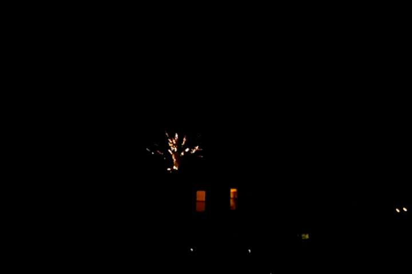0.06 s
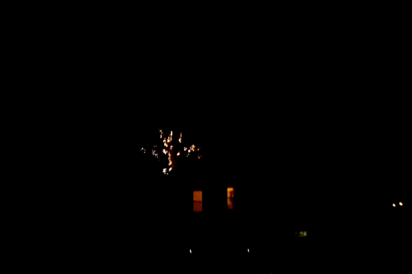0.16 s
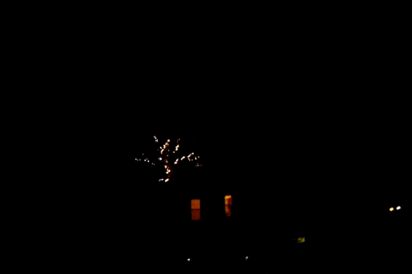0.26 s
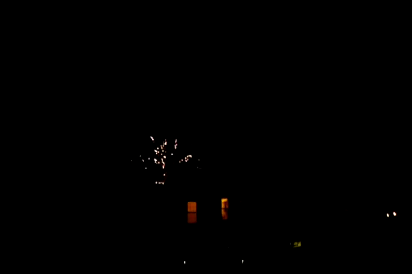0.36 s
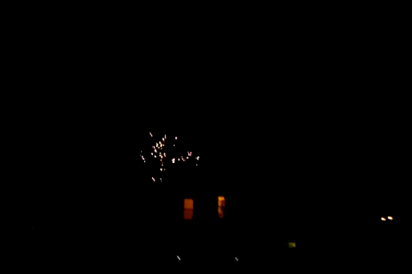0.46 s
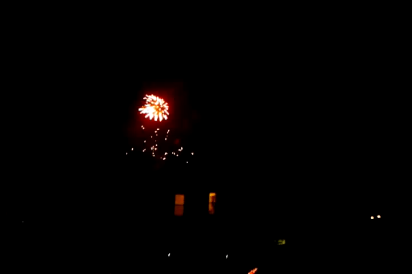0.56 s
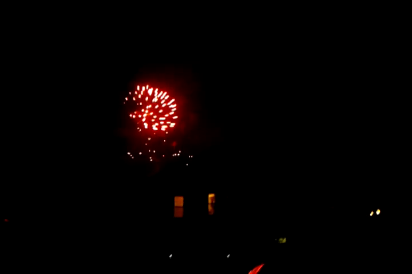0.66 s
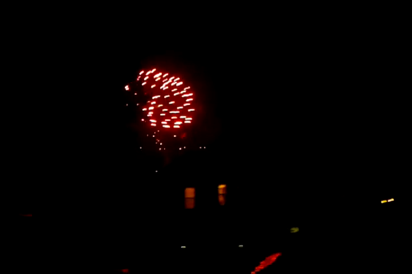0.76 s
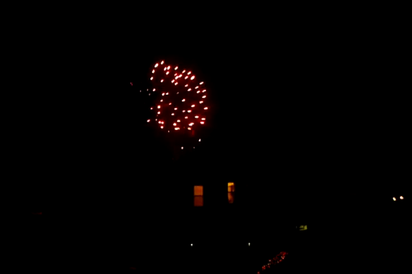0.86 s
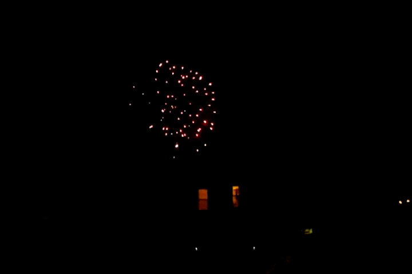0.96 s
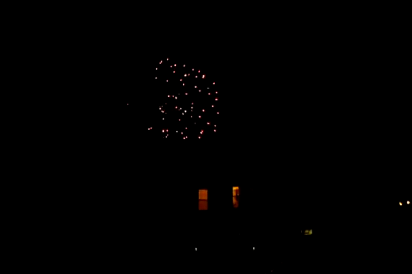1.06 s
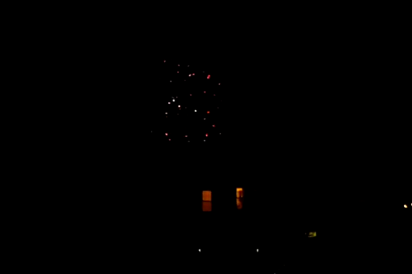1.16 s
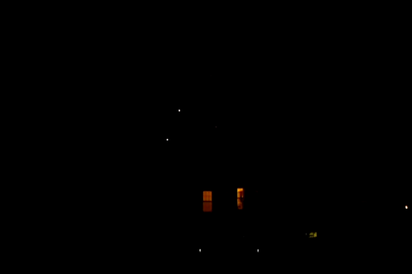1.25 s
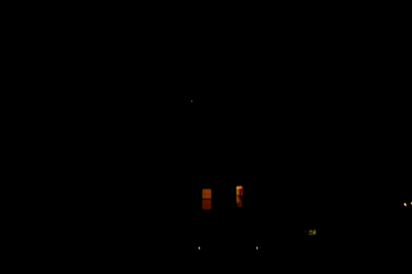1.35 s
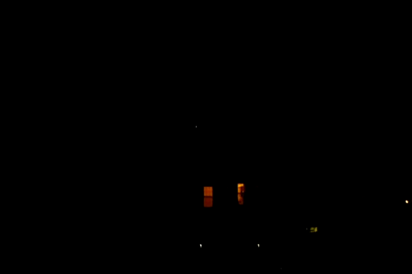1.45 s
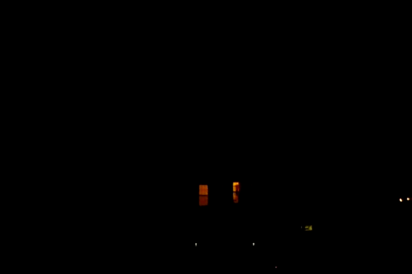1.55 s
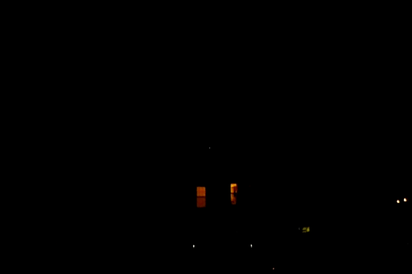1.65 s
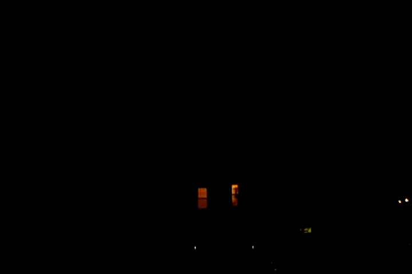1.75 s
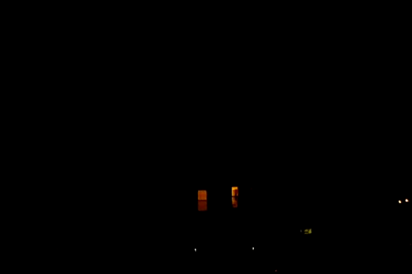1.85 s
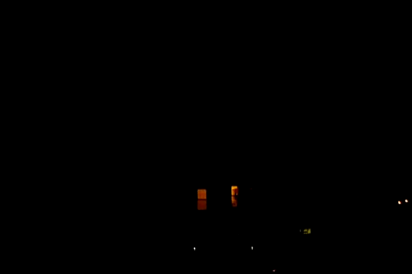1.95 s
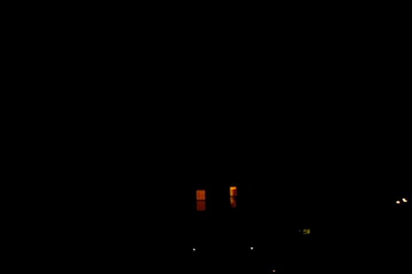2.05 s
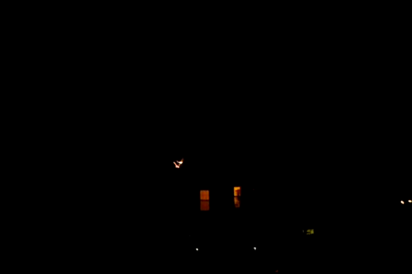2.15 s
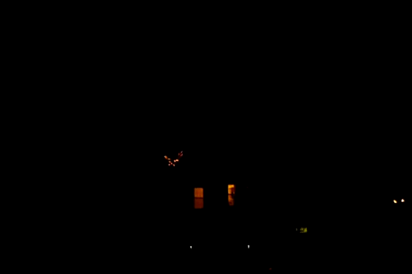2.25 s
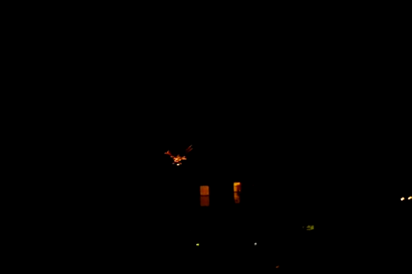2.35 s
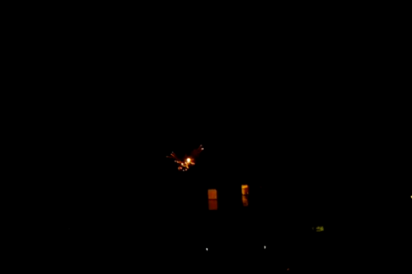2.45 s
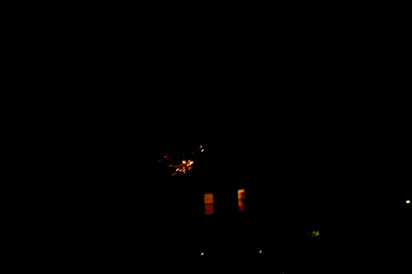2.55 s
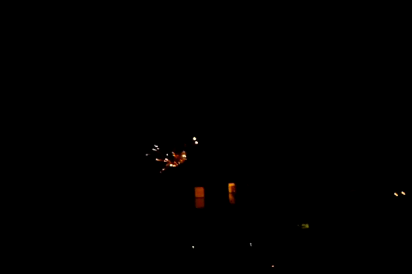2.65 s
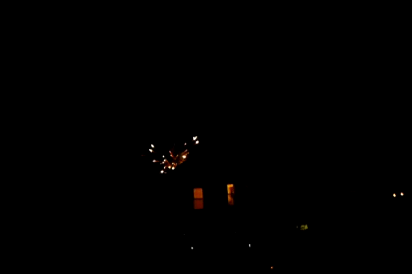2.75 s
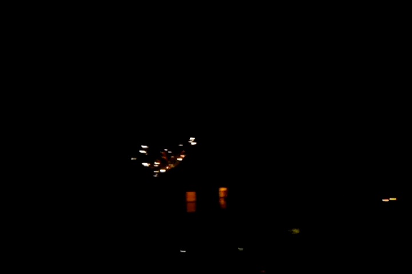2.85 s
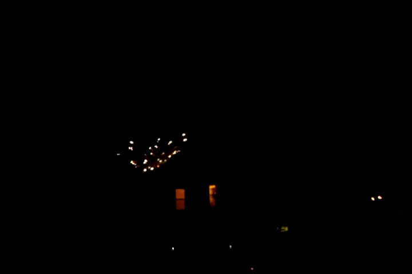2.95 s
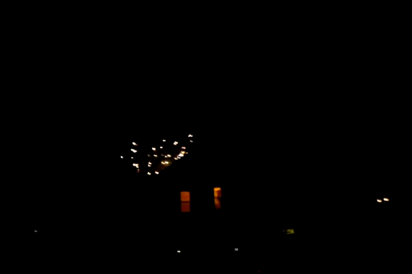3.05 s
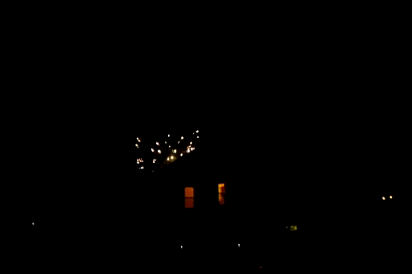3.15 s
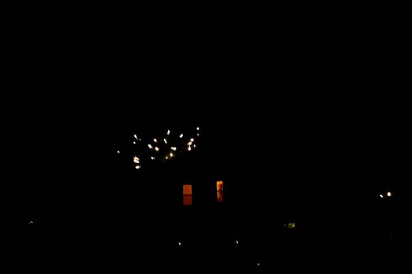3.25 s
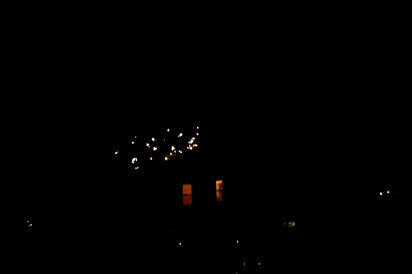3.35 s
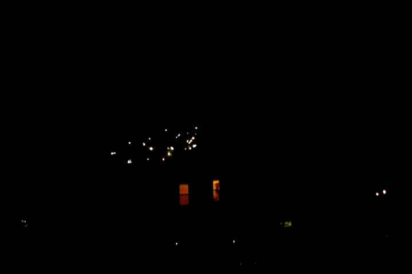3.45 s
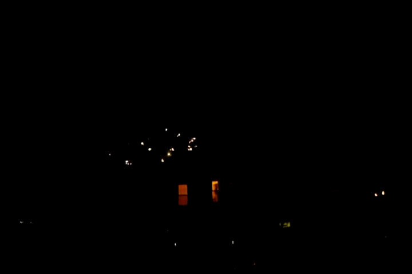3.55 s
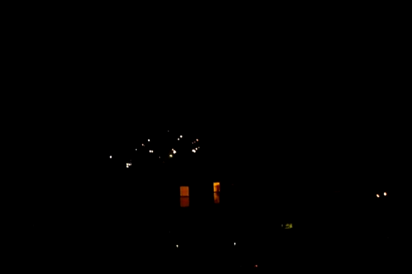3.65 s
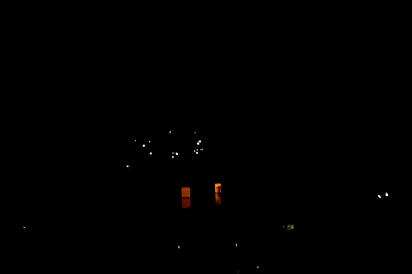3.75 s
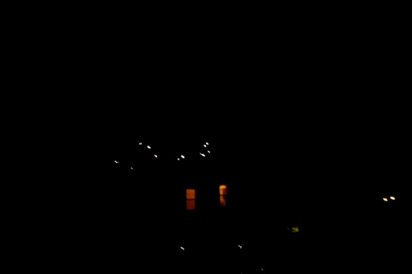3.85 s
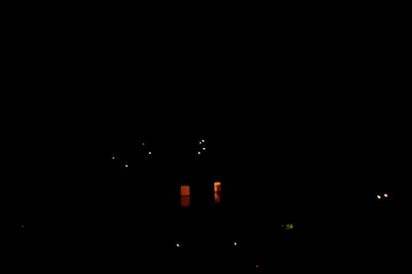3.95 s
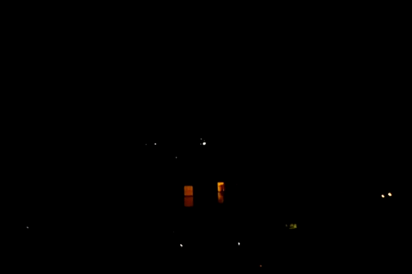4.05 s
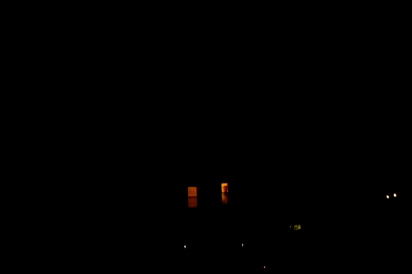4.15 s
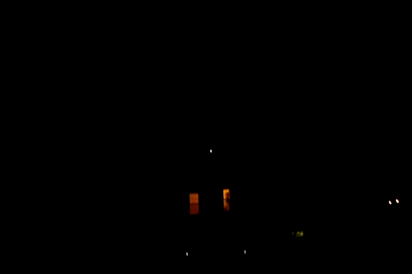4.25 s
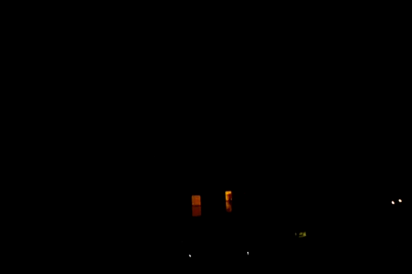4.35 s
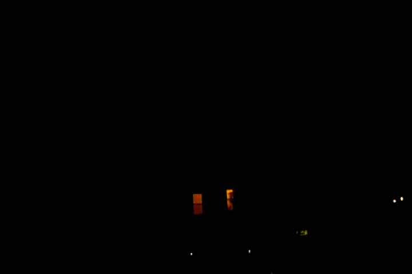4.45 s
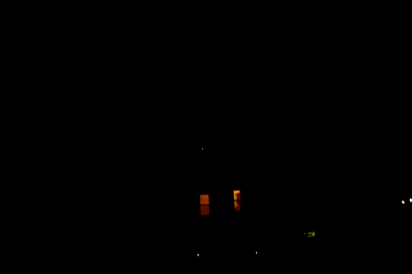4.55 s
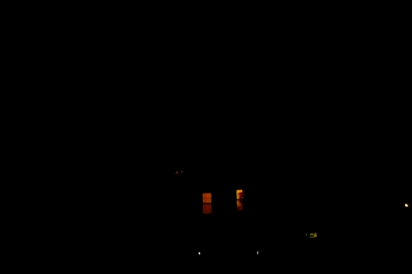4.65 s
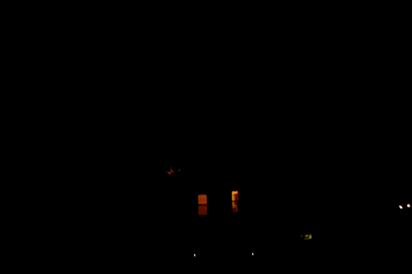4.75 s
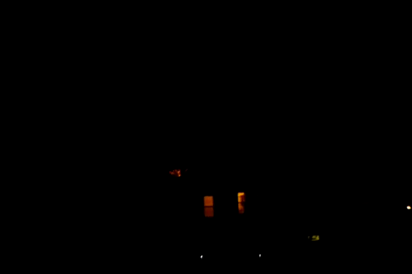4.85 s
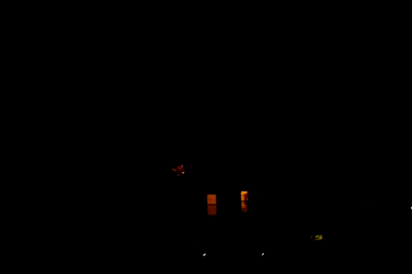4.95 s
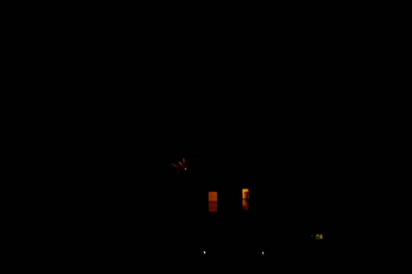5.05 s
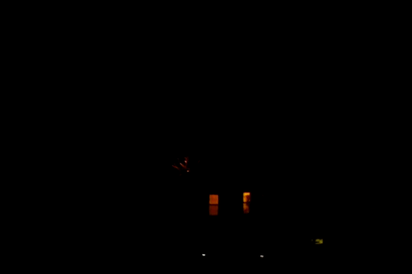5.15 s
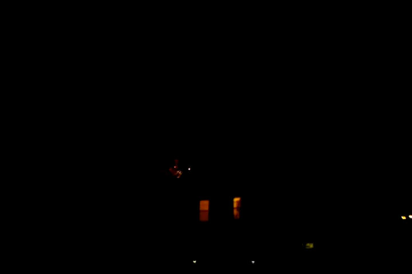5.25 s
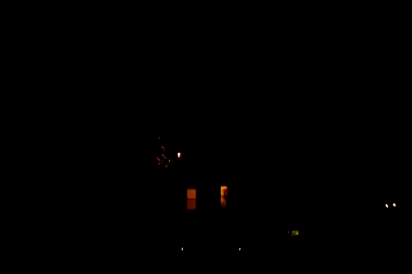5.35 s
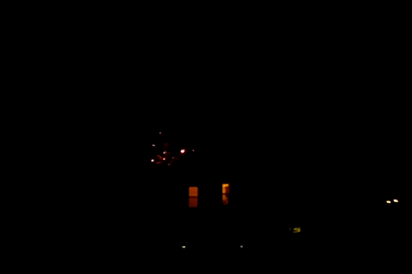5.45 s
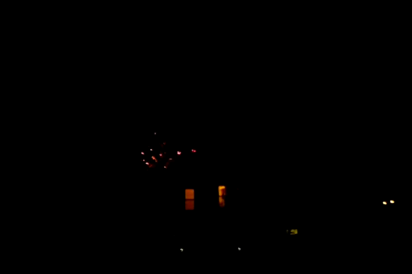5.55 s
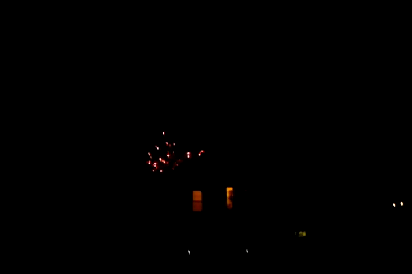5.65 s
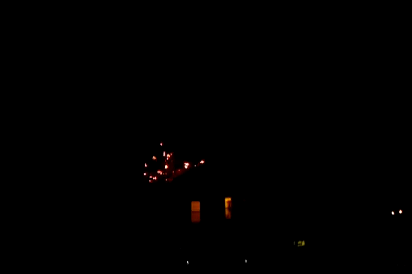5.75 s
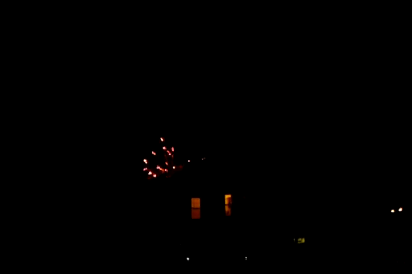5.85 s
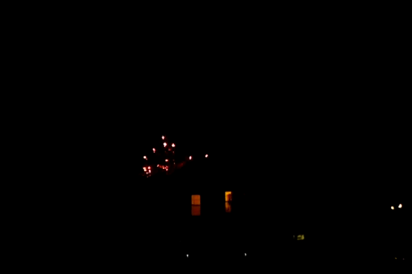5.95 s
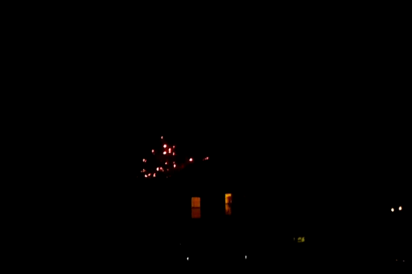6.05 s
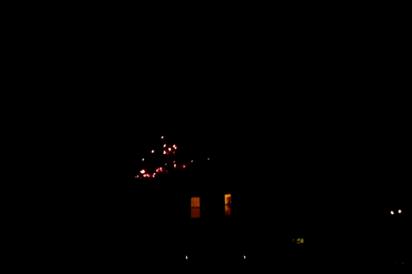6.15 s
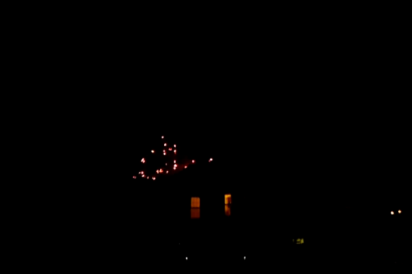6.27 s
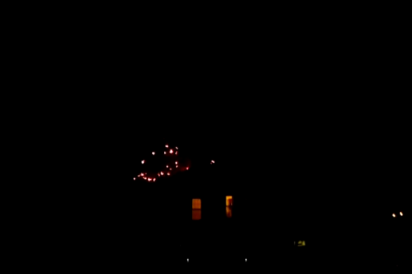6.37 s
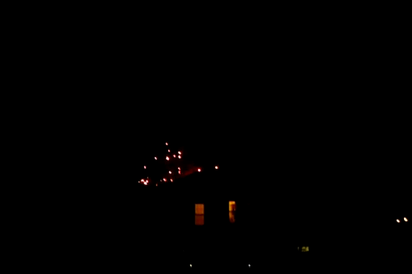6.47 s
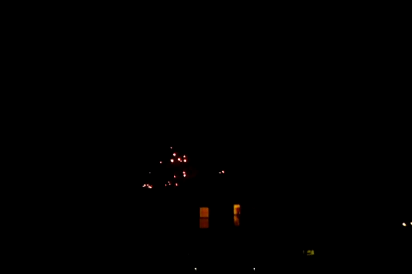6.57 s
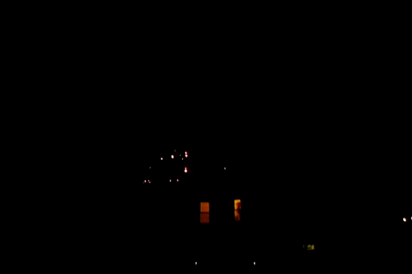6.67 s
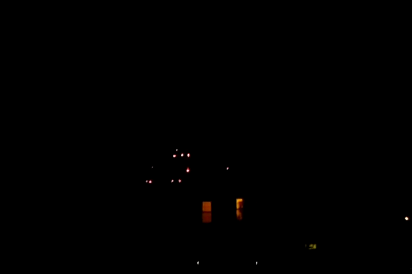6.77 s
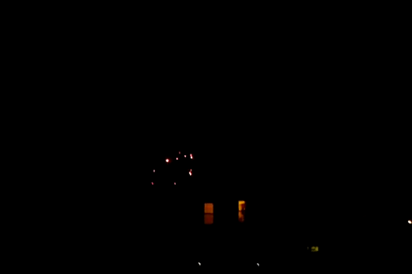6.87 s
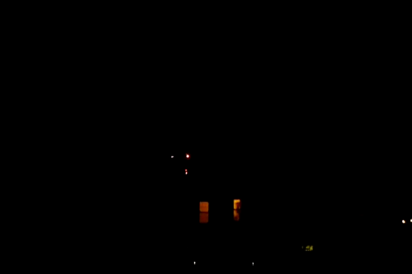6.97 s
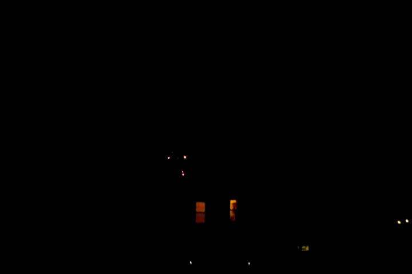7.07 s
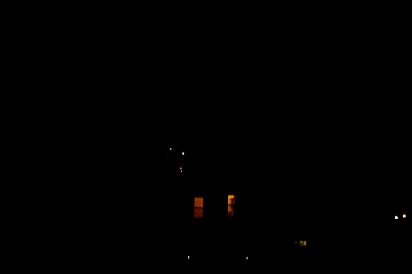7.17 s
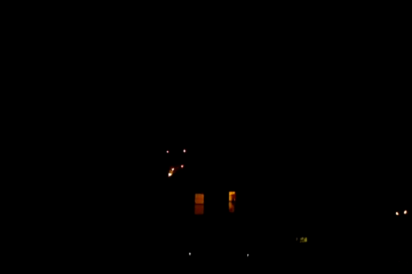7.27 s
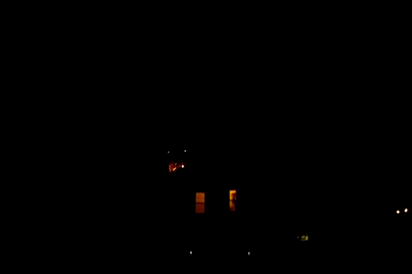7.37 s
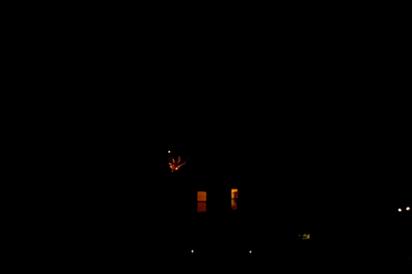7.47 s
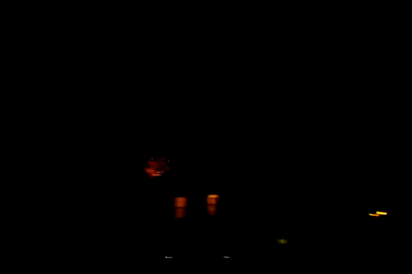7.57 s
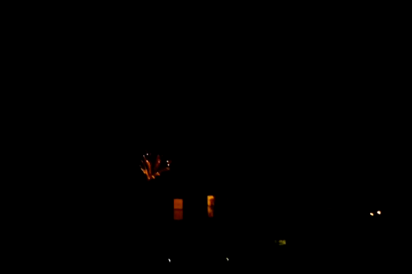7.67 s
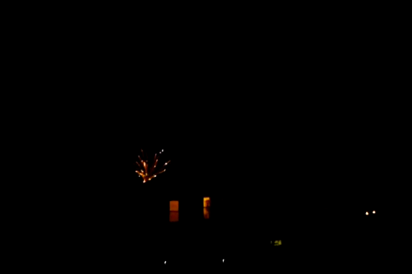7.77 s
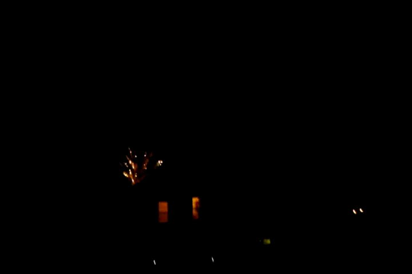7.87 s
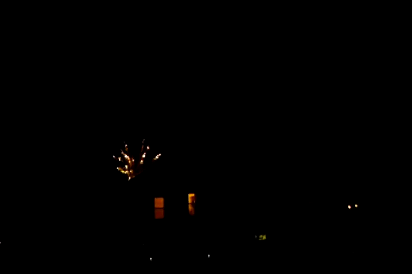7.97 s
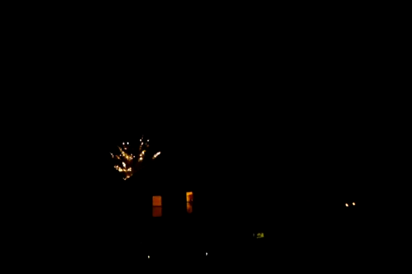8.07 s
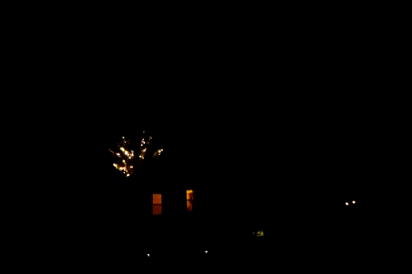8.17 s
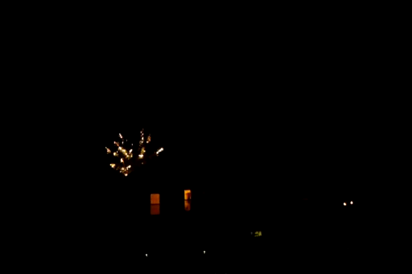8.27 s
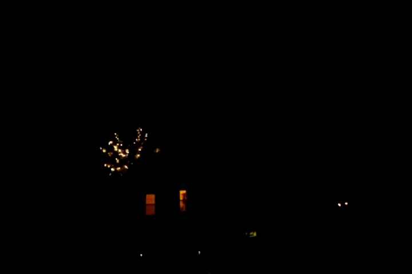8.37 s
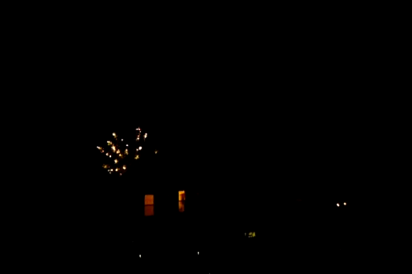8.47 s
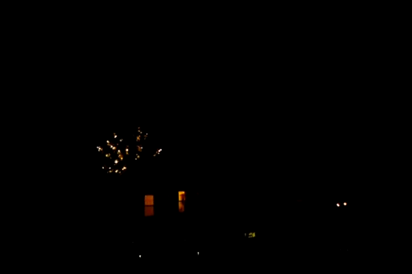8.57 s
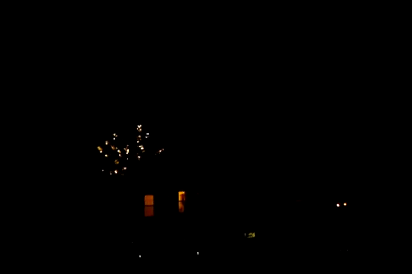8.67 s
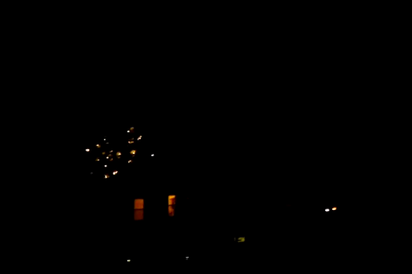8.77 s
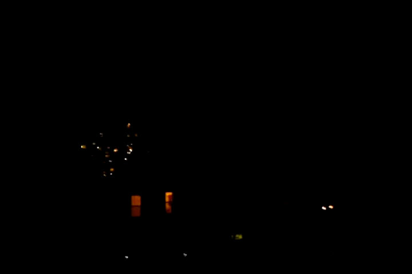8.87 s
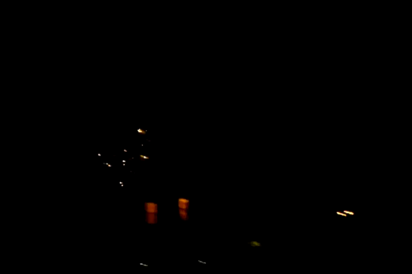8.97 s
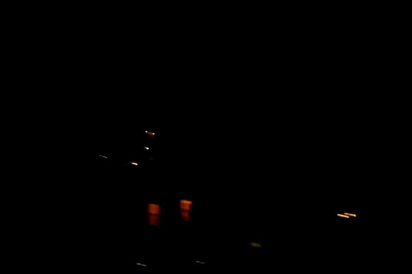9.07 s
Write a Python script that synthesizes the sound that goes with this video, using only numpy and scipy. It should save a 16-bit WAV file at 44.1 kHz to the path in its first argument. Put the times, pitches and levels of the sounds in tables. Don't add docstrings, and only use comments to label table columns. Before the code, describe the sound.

Distant fireworks burst in quick clusters a few seconds apart, overloading a small microphone, with sizzling and snapping stars and rumbling echoes.

```python
import sys
import numpy as np
from scipy import signal
from scipy.io import wavfile

SR = 44100
rng = np.random.default_rng(int(sys.argv[2]) if len(sys.argv) > 2 else 0)


def gain_from_decibels(decibels):
    exponent = np.asarray(decibels, float) / 20
    return 10 ** exponent


def master(y):
    cut = np.clip(np.atleast_2d(y).T, -1, 1)
    pcm = np.round(cut * 32767)
    wavfile.write(sys.argv[1], SR, pcm.astype(np.int16))


N = 402191


def at_hz(points, hz):
    points_hz, points_db = np.transpose(points)
    return np.interp(np.log(hz), np.log(points_hz), points_db)


def filtered(x, kind, hz, order=2):
    return signal.sosfilt(signal.butter(order, hz, kind, fs=SR, output="sos"), x)


def bands(sources):
    edges_hz = 20 * 2 ** np.arange(0, 9.1, 0.5)
    split = []
    for k, (low, high) in enumerate(zip(edges_hz, edges_hz[1:])):
        split.append((np.sqrt(low * high), filtered(sources[k % 2], "band", [low, high])))
    return split


def spikes(shape, spread_db):
    size_db = spread_db * np.minimum(rng.exponential(1, shape), 5)
    grains = gain_from_decibels(size_db) * rng.choice([-1, 1], shape)
    return grains / np.sqrt(np.mean(grains ** 2))


# f/Hz, density/dB per Hz
NIGHT_SPECTRUM = [(12, -35), (20, -18), (44, -9.5), (102, -13.5), (279, -10.5), (309, -2), (333, -25.5),
                  (397, -8), (428, -9), (932, -26), (3530, -34.5), (6290, -31.5), (8080, -20), (10500, -54),
                  (17800, -120)]
NIGHT_DB = -43 + 2.0
EARLIER_RUMBLE_DB, EARLIER_FALL_DB_S = -2, 3.5


def night():
    sources = rng.standard_normal((2, N))
    noise = sum(gain_from_decibels(at_hz(NIGHT_SPECTRUM, hz)) * band for hz, band in bands(sources))
    earlier = gain_from_decibels(EARLIER_RUMBLE_DB - EARLIER_FALL_DB_S * np.arange(N) / SR)
    return gain_from_decibels(NIGHT_DB) * (1 + earlier) * noise / np.std(noise)


def blasts(rows, thump_db, slower, crack_db, far=False):
    out = np.zeros(N)
    t = np.arange(int(0.06 * SR)) / SR
    for s, blast_db, hz, cycles, shore_db in rows:
        swing = np.cos(2 * np.pi * hz * t - 0.2) * np.exp(-t * hz / cycles)
        thump_hz = slower * hz
        thump = np.sin(2 * np.pi * thump_hz * t) * np.exp(-1.2 * thump_hz * t)
        front = np.cos(2 * np.pi * 2600 * t) * np.exp(-t / 0.000087)
        wave = swing + gain_from_decibels(thump_db) * thump + gain_from_decibels(crack_db) * front
        start = round(s * SR)
        out[start:start + len(t)] += gain_from_decibels(blast_db + far * shore_db) * wave[:N - start]
    return out


def mirrors(echoes):
    response = np.zeros(int(2.6 * SR))
    click = np.eye(1, 600)[0]
    for delay_s, level_db, sign, dull_hz in echoes:
        start = round(delay_s * SR)
        response[start:start + len(click)] += sign * gain_from_decibels(level_db) * filtered(click, "low", dull_hz)
    return response


# f/Hz, level/dB
SCATTER_COLOUR = [(40, 12.5), (85, 0), (160, -1.5), (260, 2), (400, -3), (700, -1.7), (1100, -2), (1800, 2),
                  (3200, -2), (7000, 3)]
# level/dB, tilt above 1 kHz/dB per octave, fall/dB per s, extra fall/dB per s per kHz
RIPPLES = (-37, 1.5, 793, -23.5)
BANKS = (-46, 0.5, 49.5, 1.5)
HILLS = (-52.5, -4.5, 15, 0)
ARRIVE_S, BANKS_LAST_S = 0.014, 0.15
LUMP_S, LUMP_DB, LUMP_BELOW_HZ = 0.009, 2.0, 900
RIDGE_S, RIDGE_WIDTH_S, RIDGE_DB = 1.136, 0.08, 0


def crowd(reflectors, hz, since_s):
    level_db, tilt_db, fall_db_s, faster_db_s = reflectors
    start_db = level_db + tilt_db * np.log2(max(hz / 1000, 1))
    return gain_from_decibels(start_db - (fall_db_s + faster_db_s * hz / 1000) * since_s)


def scatter(grain_db):
    t = np.arange(int(2.6 * SR)) / SR
    arrived = (1 - np.exp(-t / ARRIVE_S)) ** 2
    knots_s = np.arange(0, 2.7, LUMP_S)
    lumps = gain_from_decibels(np.interp(t, knots_s, LUMP_DB * rng.standard_normal(len(knots_s))))
    ridge = gain_from_decibels(RIDGE_DB * np.exp(-((t - RIDGE_S) / RIDGE_WIDTH_S) ** 2))
    out = np.zeros(len(t))
    for hz, band in bands(ridge * spikes((2, len(t)), grain_db)):
        ripples = crowd(RIPPLES, hz, t)
        banks = crowd(BANKS, hz, np.maximum(t - BANKS_LAST_S, 0))
        hills = crowd(HILLS, hz, t)
        level = np.sqrt(ripples ** 2 + arrived ** 2 * (banks ** 2 + hills ** 2))
        if hz < LUMP_BELOW_HZ:
            level = level * lumps
        out += gain_from_decibels(at_hz(SCATTER_COLOUR, hz)) * level * band
    return out


def outdoors(x, echoes, scatter_db, grain_db):
    response = gain_from_decibels(scatter_db) * scatter(grain_db) + mirrors(echoes)
    response[0] += 1
    return signal.fftconvolve(x, response)[:N]


# t/s, blast level/dB, swing f/Hz, ringing/cycles, level towards far shore/dB
BURSTS = [(.0939, 12, 449, 0.6, -10), (.1620, 13, 414, 0.32, -6), (.2869, 11.5, 455, 1, -6),
          (.2972, 14.5, 485, 0.57, -19), (.3066, 11.5, 375, 0.44, -40), (2.9034, 11.5, 431, 0.32, -8),
          (2.9240, 13.5, 398, 0.61, -29), (3.1210, 11, 487, 0.96, -6), (3.2427, 13.5, 381, 0.51, -6.5),
          (3.2903, 11, 446, 0.62, -11.5), (5.3549, 10.5, 397, 0.51, -0.5), (5.4438, 12, 392, 0.54, -2.5),
          (5.6116, 11, 435, 0.31, -4), (5.7688, 11.5, 408, 0.47, -4.5), (6.0016, 11, 455, 0.52, -4.5),
          (7.9406, 10.5, 474, 0.53, -23), (8.0100, 11, 486, 0.48, -4), (8.0431, 13, 436, 0.66, -7),
          (8.1004, 14, 475, 0.57, -7.5)]
# delay t/s, level/dB, sign, dulled above f/Hz
ECHOES = [(.0027, -8, 1, 7500), (.0120, -11, 1, 1000), (.0217, -22, -1, 1200), (.0337, -19, 1, 6000),
          (.0526, -24, -1, 1200), (.0652, -23, 1, 1200), (.0855, -16, -1, 1500), (.0925, -17, 1, 1500),
          (.1334, -22, 1, 1200), (.1457, -18, -1, 1200), (.1576, -15, 1, 1500), (.1829, -14, 1, 1500),
          (.2640, -25, 1, 1000), (.7340, -20, -1, 420), (.7345, -32, -1, 2200), (1.05, -38, 1, 500),
          (1.3750, -37, 1, 600)]
# delay t/s, level/dB, signed gain, dulled above f/Hz
FAR_SHORE = [
    (.3400, -10.5, 0.74, 1460),
    (.3428, -16, -1.6, 2030),
    (.4270, -47, 0.81, 1190),
    (.5010, -19.5, 0.57, 900),
    (.6570, -13.5, 0.86, 350),
]


def low_shells():
    near = blasts(BURSTS, thump_db=-27.5, slower=0.72, crack_db=-13.0)
    shore = blasts(BURSTS, thump_db=-42, slower=0.6, crack_db=-3.0, far=True)
    returned = signal.fftconvolve(shore, mirrors(FAR_SHORE))[:N]
    return outdoors(near, ECHOES, scatter_db=3.5, grain_db=7.5) + returned


CATCH_DB_S, SAG_DB_S, DIE_DB_S = 32, 12, 83


def burn(rows):
    t = np.arange(N) / SR
    level = np.zeros(N)
    for alight_s, spent_s, level_db in rows:
        catching_db = CATCH_DB_S * np.maximum(alight_s - t, 0)
        sagging_db = SAG_DB_S * np.maximum(t - alight_s, 0)
        dying_db = DIE_DB_S * np.maximum(t - spent_s, 0)
        level += gain_from_decibels(level_db - catching_db - sagging_db - dying_db) * (t > alight_s - 0.6)
    return level


def snap(clicks, hz, cycles):
    t = np.arange(int(0.002 * SR)) / SR
    return signal.fftconvolve(clicks, np.cos(2 * np.pi * hz * t) * np.exp(-t * hz / cycles))[:N]


def small_snaps(sharp, full):
    return snap(filtered(sharp, "high", 3100), hz=6300, cycles=0.2) + snap(full, hz=1900, cycles=0.27)


def fizz(rows, per_s, body_db, clump):
    struck = rng.random(N) < per_s * clump / SR
    sharp = struck * spikes(N, spread_db=3.5) * burn(rows) * gain_from_decibels(-1.5) * np.sqrt(SR / per_s)
    return small_snaps(sharp, sharp * gain_from_decibels(body_db) * rng.choice([-1, 1], N))


# fully alight t/s, burnt out t/s, level/dB
GLITTER = [
    (.85, 1.5, -16.5),
    (8.95, 9.5, -17.5),
]
GLITTER_PER_S, GLITTER_BODY_DB = 2900, -14.5
FLASH_PER_S, FLASH_DB, FLASH_BODY_DB = 50, -8, -13


def glitter(clump):
    struck = rng.random(N) < FLASH_PER_S / SR
    flashes = struck * burn(GLITTER) * gain_from_decibels(FLASH_DB - 7.4 * rng.random(N))
    lesser = small_snaps(flashes, flashes * gain_from_decibels(FLASH_BODY_DB))
    return fizz(GLITTER, GLITTER_PER_S, GLITTER_BODY_DB, clump) + lesser


# t/s, peak level/dB, body level/dB
FLASHES = [(0.7983, -9, -19), (0.8084, -9, -21), (0.8317, -8, -14), (0.8617, -8, -14), (0.8722, -7, -16),
           (0.9004, -7, -20), (0.9243, -6, -13), (0.9793, -7, -15), (1.095, -9, -9), (1.1502, -8, -18),
           (1.2402, -9, -9), (1.2559, -10, -13), (8.6169, -12, -10), (8.6472, -14, -14), (8.704, -14, -14),
           (8.7528, -12, -17), (8.8204, -8, -18), (8.9409, -5, -19), (8.9872, -7, -16), (8.9994, -9, -21),
           (9.0484, -6, -18), (9.0584, -8, -16), (9.1006, -7, -19), (9.1144, -8, -10)]
# t/s, peak level/dB, body level/dB
CRACKS = [(1.4939, -11, -5), (1.4984, -6, -9), (1.503, -7, -8), (1.57, -9, -9), (1.6472, -11, -6),
          (1.6792, -13, -9), (1.6854, -8, -13), (1.6918, -11, -5), (1.7179, -10, -2), (1.7354, -10, -14),
          (1.7642, -10, -1), (1.8178, -11, -7), (1.8242, -6, -1), (1.847, -6, -7), (1.8668, -5, -1),
          (1.8714, -7, 1), (1.8897, -7, -9), (1.8985, -7, 4), (1.9194, -6, 9), (1.9321, -5, -4),
          (1.9484, -8, -1), (1.9648, -9, -8), (1.973, -9, -3), (1.9897, -3, -2), (1.9975, -10, 3),
          (2.0061, -5, -5), (2.023, -8, 1), (2.0316, -4, -1), (2.041, -3, -2), (2.0554, -6, 0)]
# t/s, peak level/dB, body level/dB
STRAGGLERS = [(2.0813, -27, 1), (2.0911, -19, -3), (2.109, -19, -3), (2.1359, -12, -10), (2.1437, -5, -1),
              (2.1546, -17, -6), (2.2192, -19, -8), (2.225, -11, -3), (2.2386, -7, -2), (2.4456, -17, -5),
              (2.564, -14, -11), (2.6203, -8, -5), (2.6484, -12, -9), (2.6687, -25, -12),
              (2.7781, -23, -10), (2.799, -39, -7)]
WATER_LAG_S = (.0012, .0024)   # shortest, longest t/s
WATER_DB = -5


def star_cracks():
    peaks, bodies = np.zeros((2, N))
    s, peak_db, body_db = np.transpose(FLASHES + CRACKS + STRAGGLERS)
    direct = (0, 0)
    off_water = (rng.uniform(*WATER_LAG_S, len(s)), WATER_DB - 8 * rng.random(len(s)))
    for lag_s, loss_db in (direct, off_water):
        at = ((s + lag_s) * SR).astype(int)
        peaks[at] = gain_from_decibels(peak_db + loss_db + 3.5)
        bodies[at] = gain_from_decibels(peak_db + loss_db + np.minimum(body_db, 1) + 0.5)
    fading = signal.lfilter([1], [1, -np.exp(-1 / (0.004 * SR))], bodies)
    tearing = gain_from_decibels(-5.0) * filtered(fading * spikes(N, spread_db=2.0), "band", [500, 2800])
    return snap(peaks, hz=3900, cycles=0.18) + snap(bodies, hz=1700, cycles=0.12) + tearing


# fully alight t/s, burnt out t/s, level/dB
SPUTTER = [
    (1.85, 2.06, -29.5),
]
SPUTTER_PER_S, SPUTTER_BODY_DB = 320, -0.5


def stars():
    clump = gain_from_decibels(1.5 * np.repeat(rng.standard_normal(N // 256 + 1), 256)[:N])
    sputter = fizz(SPUTTER, SPUTTER_PER_S, SPUTTER_BODY_DB, clump)
    burning = glitter(clump) + star_cracks() + sputter
    echoes = [(0.0028, -30, 0.64, 6950), (0.0034, -13, 0.6, 6850), (0.0130, -18, 0.85, 4800)]
    return outdoors(burning, echoes, scatter_db=-8.5, grain_db=2.0)


# t/s, blast level/dB, swing f/Hz, ringing/cycles, level towards far shore/dB
BIG_BURST = [
    (1.2717, 21.5, 292, 0.19, .1),
]
# delay t/s, level/dB, signed gain, dulled above f/Hz
BIG_ECHOES = [(.0065, -2, 0.86, 4860), (0.0139, 7.5, 0.87, 1730), (0.016, -1, 0.71, 1260),
              (0.0241, -7.5, 1, 897), (0.0363, -17.5, 1, 836), (0.065, -11.5, 1, 900), (0.0845, -3, 1, 610),
              (0.096, -10.5, -1, 398), (0.137, -15.5, 1, 400), (.1800, -11, 0.94, 298),
              (0.272, -22, 1, 300), (0.336, -13, 0.51, 252), (0.7245, -20, -1.13, 420)]


def big_shell():
    blast = blasts(BIG_BURST, thump_db=-20, slower=0.28, crack_db=-7.0)
    return outdoors(blast, BIG_ECHOES, scatter_db=0.5, grain_db=1.5)


def scene():
    heard = filtered(low_shells() + stars() + big_shell(), "high", 130)
    port = signal.lfilter(*signal.iirpeak(6500, 4.5, fs=SR), heard)
    return (heard + gain_from_decibels(0.5) * port + night())[None]


def top_cut(x):
    return signal.sosfilt(signal.butter(12, 17000, fs=SR, output="sos"), x)


ROLL_OFF_HZ, CUTOFF_HZ = 6670, 8120


def record(dry):
    soft = filtered(np.clip(dry, -1.8, 1.8), "low", ROLL_OFF_HZ, order=4)
    steep = signal.firwin(201, CUTOFF_HZ, window=("kaiser", 7), fs=SR)
    cut = signal.fftconvolve(soft, steep[None], "same")
    return top_cut(np.clip(cut, -1, 1))


dry = scene()
out = record(dry)
master(out)
```